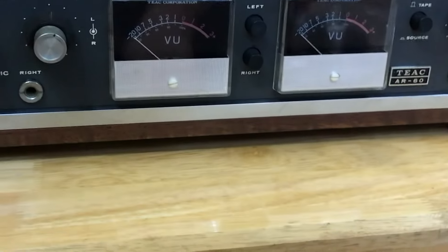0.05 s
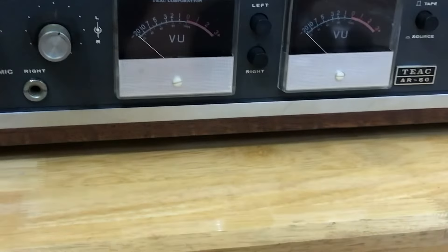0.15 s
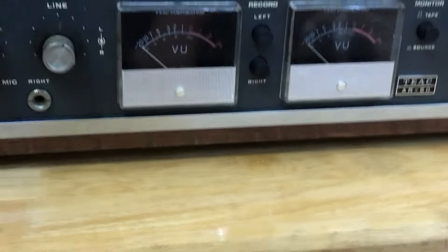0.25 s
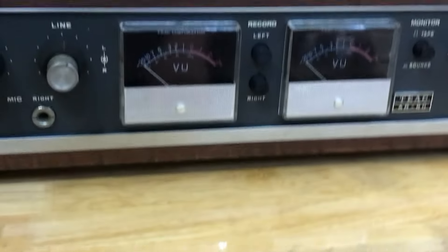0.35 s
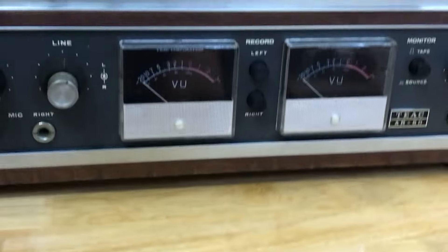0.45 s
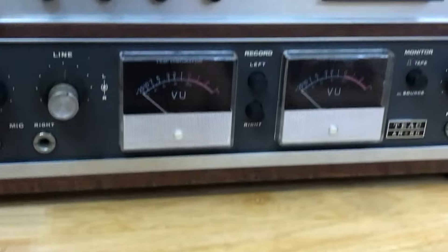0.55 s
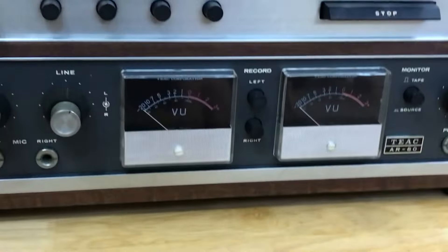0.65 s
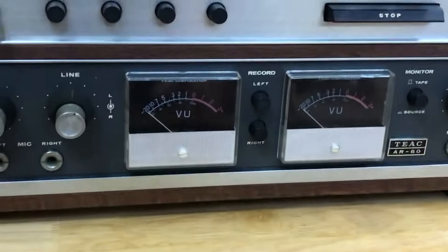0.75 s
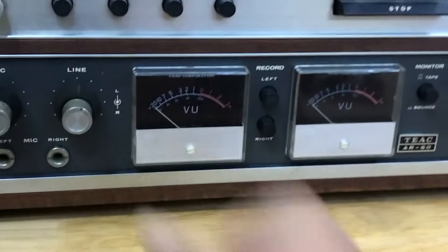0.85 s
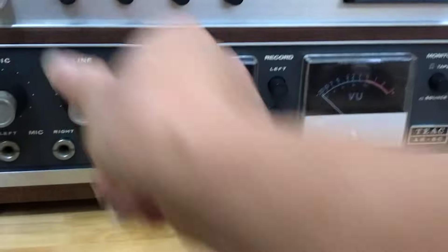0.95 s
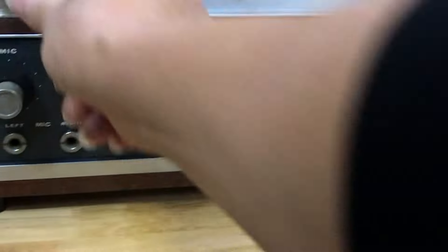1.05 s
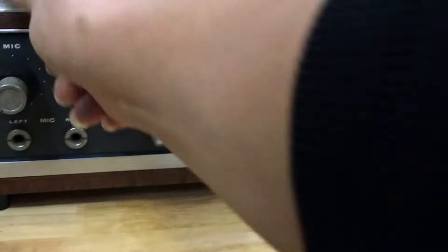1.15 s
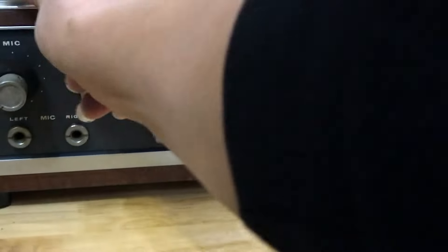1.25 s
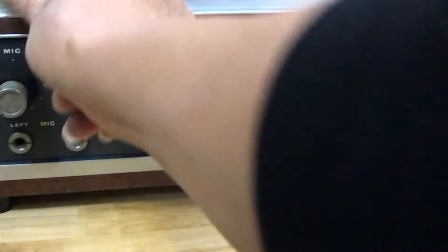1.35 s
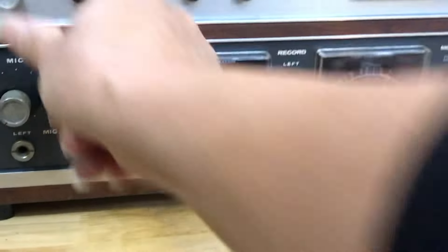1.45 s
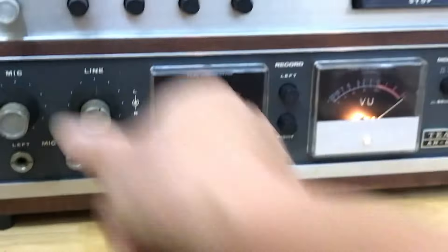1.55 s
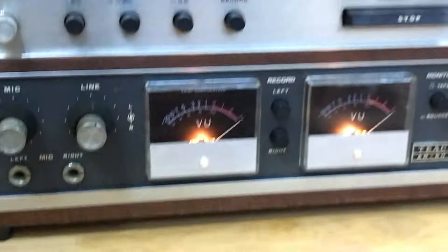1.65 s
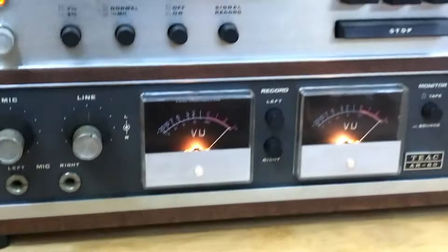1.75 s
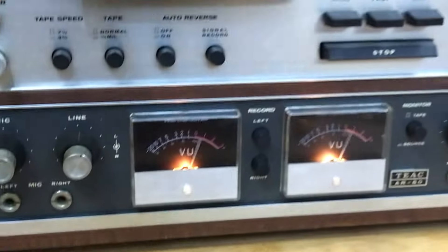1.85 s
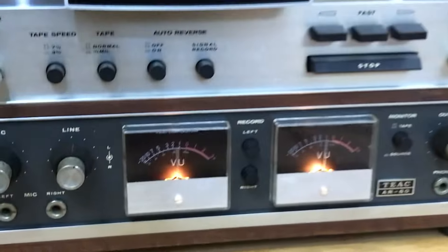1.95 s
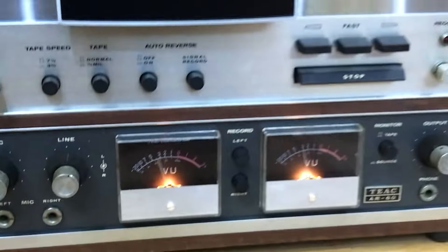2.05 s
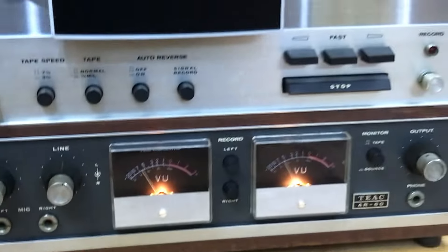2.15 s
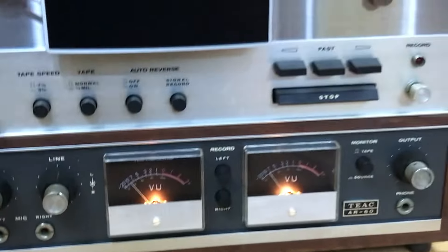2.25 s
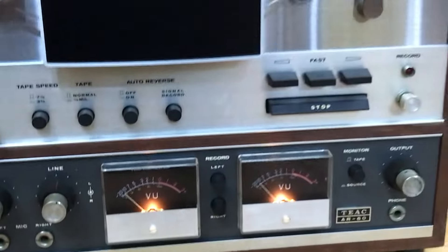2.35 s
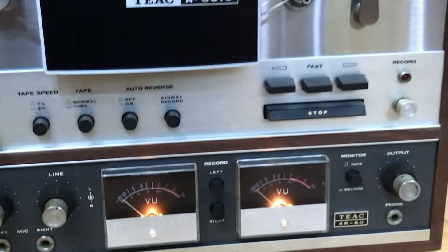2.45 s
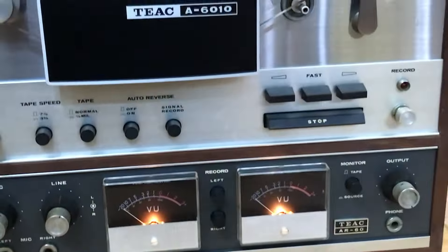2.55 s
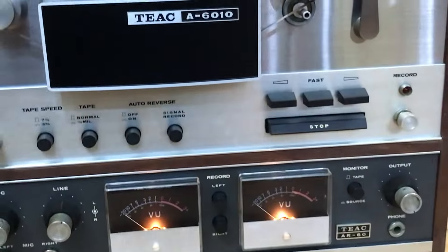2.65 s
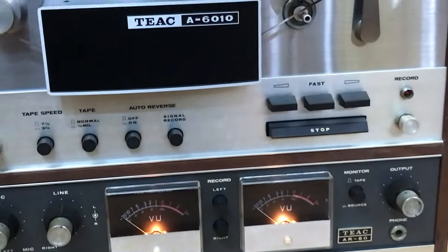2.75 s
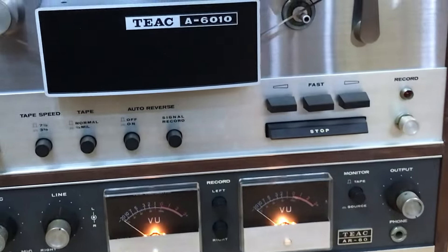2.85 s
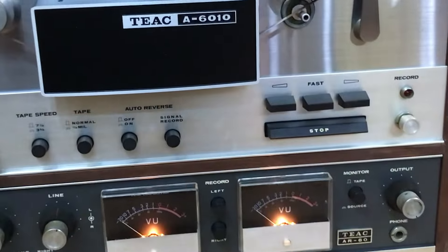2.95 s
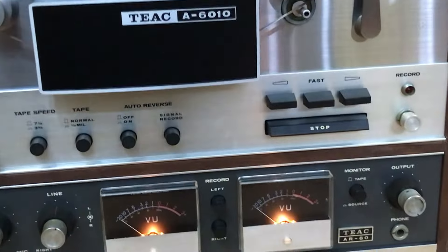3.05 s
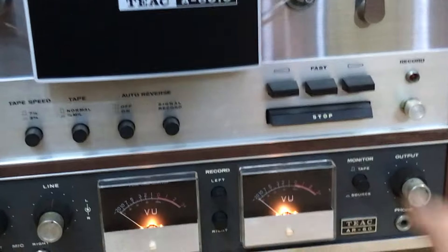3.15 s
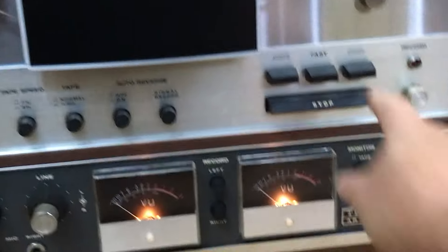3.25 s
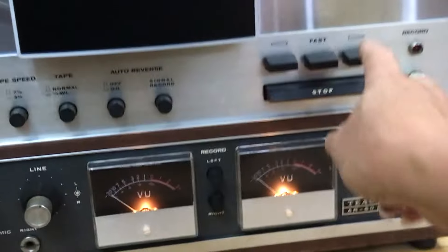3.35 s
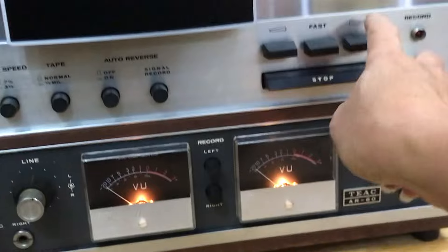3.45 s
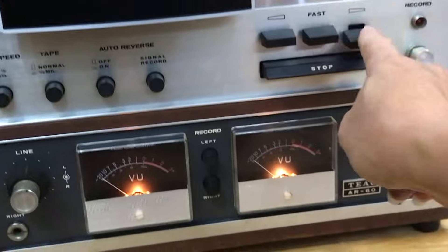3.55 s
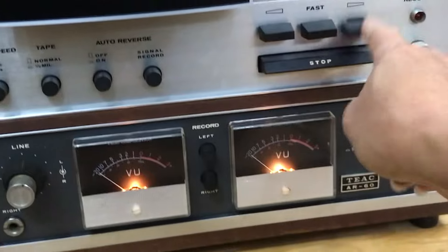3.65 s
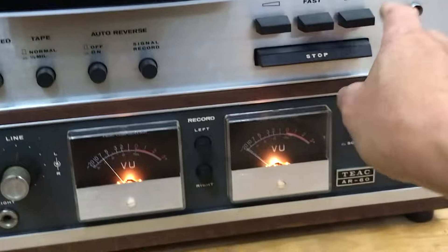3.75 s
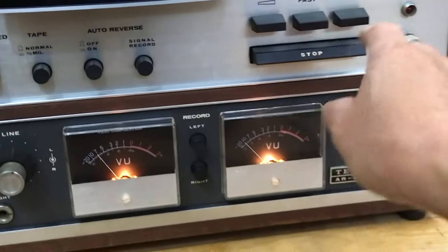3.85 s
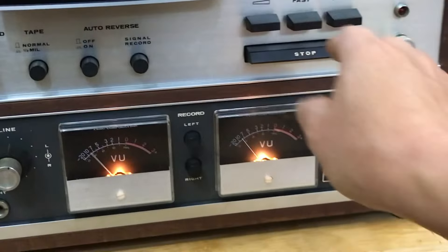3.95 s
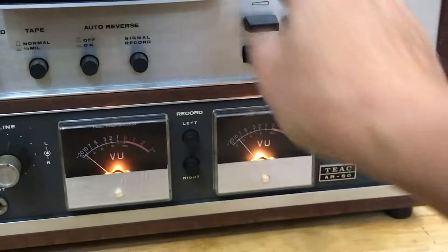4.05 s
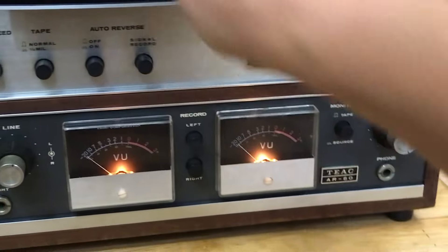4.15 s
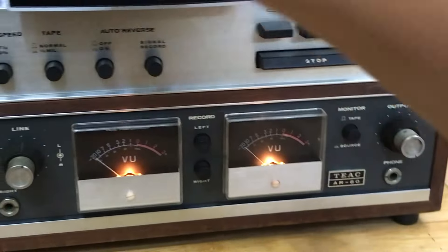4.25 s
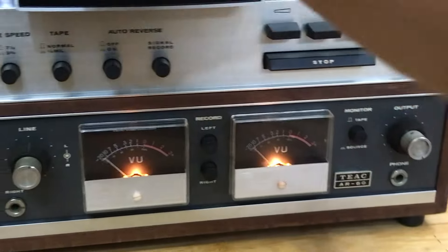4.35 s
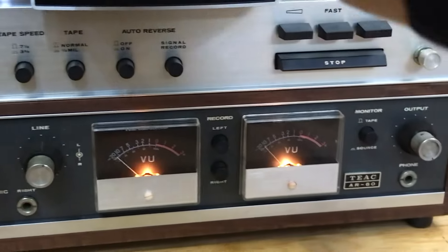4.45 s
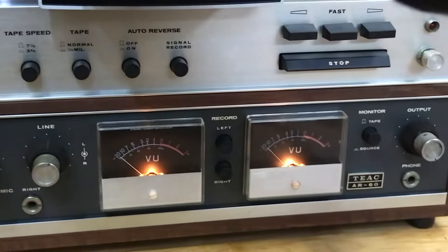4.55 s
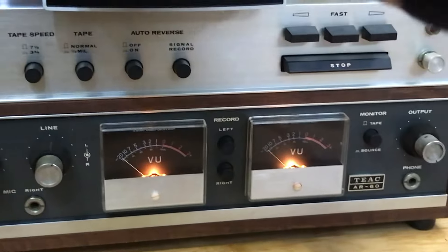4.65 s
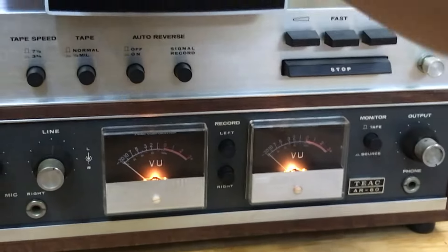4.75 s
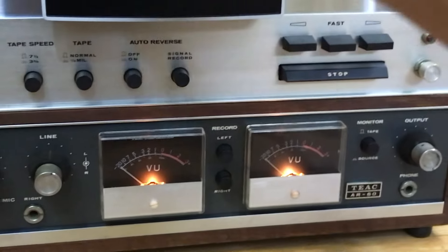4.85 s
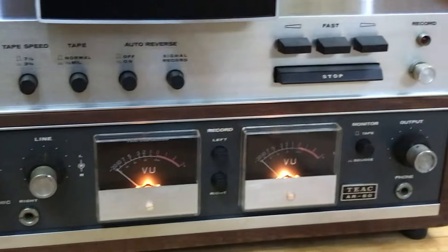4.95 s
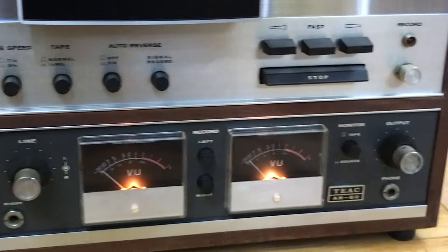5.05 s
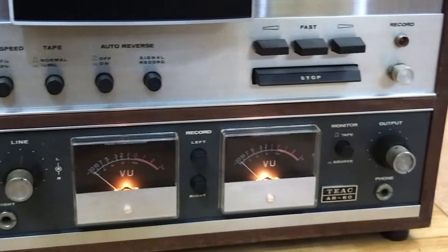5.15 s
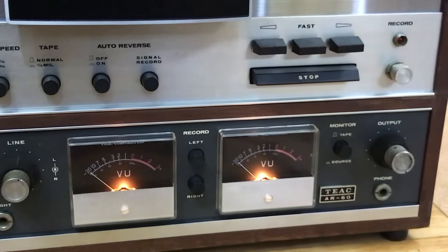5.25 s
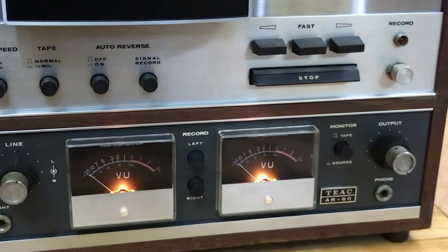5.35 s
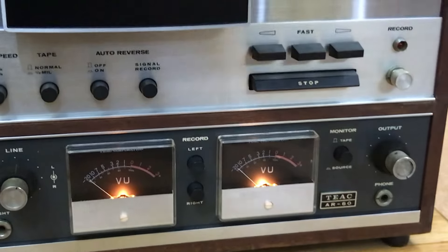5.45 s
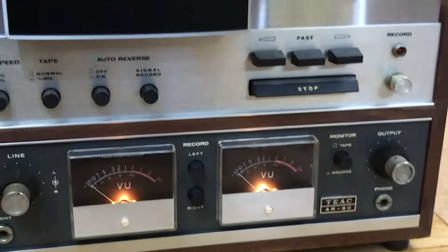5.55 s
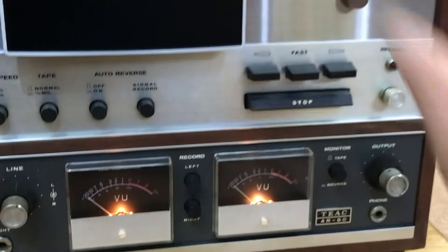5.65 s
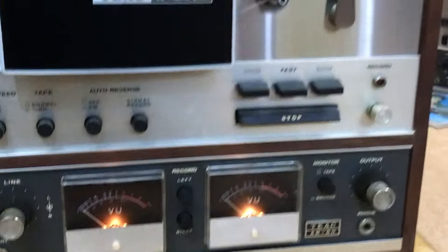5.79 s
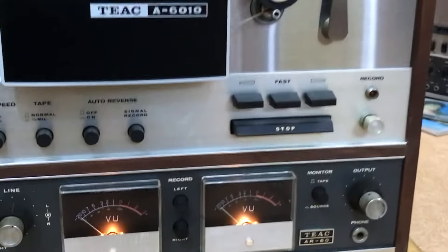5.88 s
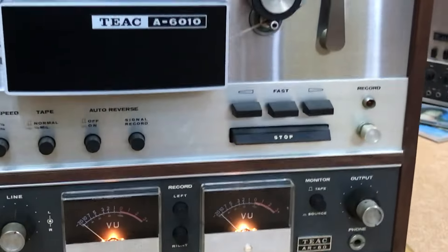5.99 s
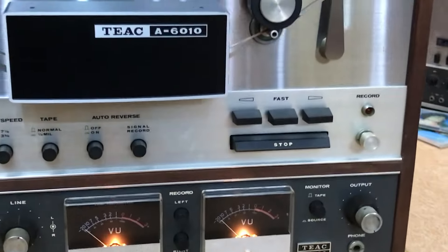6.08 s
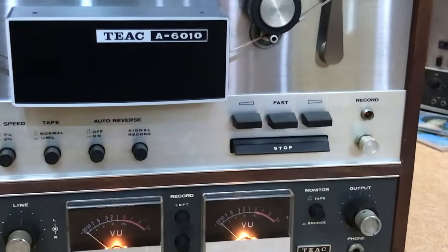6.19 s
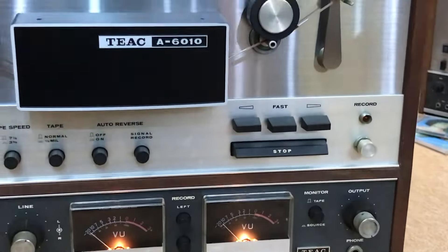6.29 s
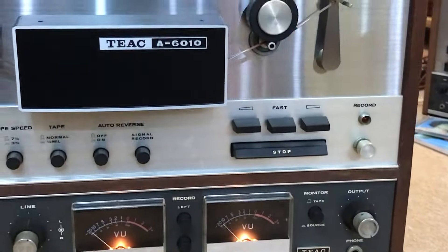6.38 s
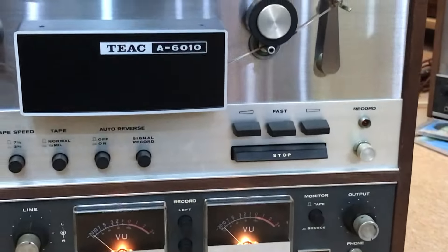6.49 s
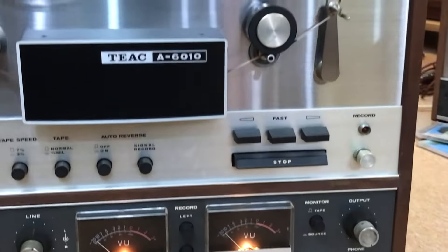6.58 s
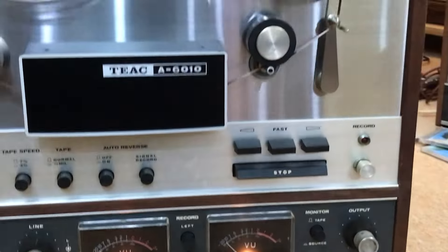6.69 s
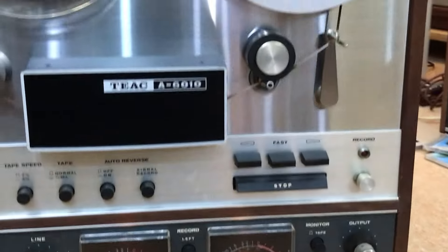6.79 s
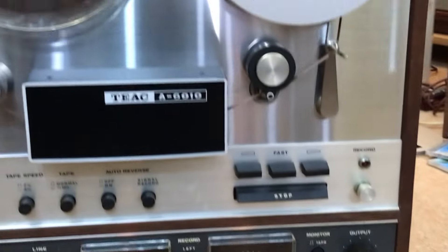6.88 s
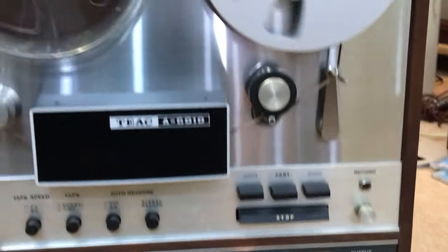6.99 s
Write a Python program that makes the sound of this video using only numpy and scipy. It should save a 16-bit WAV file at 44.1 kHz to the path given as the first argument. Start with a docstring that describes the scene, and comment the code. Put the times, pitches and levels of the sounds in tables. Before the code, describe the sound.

Close to a reel-to-reel tape deck in a small room, a power switch snaps on with a quick double click, and a motor starts humming and swishing faintly. A key then goes down with a louder, ringing metallic clunk, and the tape runs with soft hiss, a few ticks and a dull knock. Two vehicles pass quietly beyond the wall, and the hand-held microphone picks up soft bumps.

```python
"""A small room, a hand-held microphone close to a reel-to-reel tape deck on a wooden table.
The power switch snaps on; later a transport key goes down and its solenoid slams in. Each blow cracks,
rings the metal and fades in the room. A wheel in the deck swishes about eight times a second, and the
running tape hisses, ticks and knocks. Two vehicles pass beyond the wall, over far traffic, and now
and then the hand bumps the microphone."""
import sys
import numpy as np
from scipy import signal
from scipy.fft import rfft, irfft, next_fast_len
from scipy.io import wavfile
from scipy.ndimage import uniform_filter1d

SR = 44100
rng = np.random.default_rng(int(sys.argv[2]) if len(sys.argv) > 2 else 0)


def digitize_waveform(pressure):
    """Quantize a signal to 16-bit integers and store it at the path in sys.argv[1].

    Rows of a 2-D input are taken as channels; values are limited to [-1, 1].
    """
    field = np.atleast_2d(pressure).T
    bounded = np.clip(field, -1, 1)
    quanta = np.round(bounded * 32767).astype(np.int16)
    wavfile.write(sys.argv[1], SR, quanta)


N = 309650
T = np.arange(N) / SR
AGE = T[:SR // 2]  # seconds since a blow

# Blows of key, relay and solenoid, then of the power switch. Each row: start in seconds, level in dB,
# rattle decay in seconds, treble tilt in dB per octave, ring offset in dB.
TRANSPORT_BLOWS = [(3.5182, -32, 0.0033, 3, 0), (3.5287, -25.5, 0.00067, 6, -6.5),
                   (3.534, -27, 0.0079, -1, -1.5), (3.5405, -15, 0.0082, 0, -10),
                   (3.5553, -32, 0.0055, 8, 3), (3.5615, -25, 0.0074, -2.5, 3), (3.5763, -10, 0.0046, 1, 0),
                   (3.5808, -14.5, 0.0051, 2.5, 11.5), (3.6042, -4.5, 0.003, -1, -2),
                   (3.6095, -17, 0.012, 2, -13)]
SWITCH_BLOWS = [(1.1997, -26.5, 0.00055, 24, -35), (1.2058, -23, 0.0052, -7, 1),
                (1.2441, -11.5, 0.0025, 16, -16), (1.2455, -16.5, 0.0029, 1, 7),
                (1.3476, -20.5, 0.0017, -1, -8)]
# Knocks in the tape path. Each row: start in seconds, level in dB, treble tilt in dB per octave.
TAPE_KNOCKS = [(4.569, -20.5, 0), (5.3112, -33, -9)]
# Ticks of the running tape. Each row: start in seconds, level in dB, decay in seconds.
TAPE_TICKS = [(4.354, -52, .004), (4.545, -48, 0.007), (4.905, -51.5, 0.0042), (5.187, -51, 0.0043),
              (5.303, -43.5, 0.021), (6.852, -54.5, 0.0045), (6.942, -55, .004)]
# The hand on the microphone. Each row: start in seconds, level in dB.
HAND_BUMPS = [(1.704, -30), (1.915, -42), (2.045, -33.5), (2.43, -30.5), (6.769, -33.5), (6.813, -41),
              (6.879, -33), (6.947, -34)]
# The colour of each kind of blow. Each row: frequency in Hz, relative level in dB.
TRANSPORT_CRACK = [(200, -19), (400, -5.5), (520, -13), (780, -4), (1050, -6.5), (1350, -1.5), (1600, 1),
                   (2200, -3), (2850, 1.5), (3900, -9), (5600, -4), (7700, -13.5), (8900, -5.5),
                   (10500, -16), (11700, -6.5), (13500, -14), (16000, -10.5)]
SWITCH_CRACK = [(150, -10), (450, -16), (620, -6.5), (850, -14), (1020, -4), (1300, -3.5), (1750, 5),
                (2400, -4.5), (4300, 6.5), (5000, 0.5), (5800, 3.5), (8200, -2.5), (9800, 0), (16000, -13)]
KNOCK_COLOUR = [(80, -20), (230, 16), (420, 1.5), (600, 1.5), (1000, 11.5), (1650, 11), (2000, 0),
                (2500, -14.5), (6000, -35), (15000, -55)]
TICK_COLOUR = [(500, -19), (2500, 9.5), (4000, -2), (5800, 6), (8000, -5), (15000, -3)]
BUMP_COLOUR = [(30, -16), (65, -16.5), (160, 0.5), (280, -20), (600, -39), (3000, -65)]
# Parts of the deck that ring. Each row: frequency in Hz, relative level in dB, seconds to fall 60 dB.
CHASSIS_MODES = [(571, -9.5, 0.75), (687, -11, 0.23), (875, -7, 0.32), (1230, -8, 0.42), (1370, -1.5, 0.23),
                 (1620, -9, 0.17), (2130, -10, 0.38), (2390, -20, 0.35), (2840, -20, .33),
                 (3040, -30.5, .35), (3231, -22, .25), (4080, -30, .4), (5240, -18.5, 0.18),
                 (5700, -21, .25), (6180, -14, .35), (6560, -13, .3), (9350, -18, .2), (8952, -18, .18),
                 (11550, -16, .18)]
CABINET_MODES = [(149.6, -15, 0.41), (233, -2, 0.055), (307.4, 4.5, 0.23), (323, -6, 0.04), (387, -16, .06),
                 (441, -5.5, .08)]
PANEL_MODES = [(583, -4, 0.32), (1028, -1, .13), (1410, -22, .16), (1634, 5, .05), (1860, -12, 0.146),
               (4410, -3, 0.26), (4904, -28, .25), (5780, -6, 0.25), (6940, -11, 0.48), (10030, -7, 0.25),
               (11000, -21.5, 0.22)]
SPRING_MODES = [(1315, -11, 0.12), (1553, 1.5, 0.05), (1935, -4, 0.038)]
TAPE_ARM_MODES = [(168, -5, 0.17), (228, -7, 0.14), (244, 4, 0.18), (598, 6, 0.2), (987, 4, 0.23)]
# The motor's hum. Each row: frequency in Hz, level in dB.
MOTOR_HUM = [(323, -69.5), (376, -76)]
# Noise of the wheel, the tape on the heads, the street's rumble, the tyres and the microphone.
# Each row: frequency in Hz, relative level in dB.
SWISH_COLOUR = [(200, -35.5), (500, -7), (750, 0.5), (980, 2.5), (1200, -5), (1450, -5), (1900, -25),
                (4000, -24.5), (12000, -35)]
TAPE_COLOUR = [(2000, -17), (4500, -8), (6000, 0.5), (7500, -9), (11000, -6), (16000, -10)]
RUMBLE_COLOUR = [(20, -36.5), (35, -13.5), (50, -0.5), (80, -3.5), (150, 1), (210, -9.5), (320, -10),
                 (450, -18.5), (800, -31.5), (3000, -73.5)]
TYRE_COLOUR = [(150, -7.5), (400, 2.5), (750, -4.5), (1300, -1.5), (2200, -10), (4000, -17.5), (6000, -25),
               (10000, -32.5), (16000, -42)]
MIC_HISS_COLOUR = [(1180, -35.5), (2000, -10), (2380, -3), (2640, -12), (3940, 1.5), (4770, -6.5),
                   (5300, -4.5), (5990, -0.5), (7310, -10), (8850, -3), (10500, -9), (12200, -3.5),
                   (15100, -2), (16000, -10.5)]
# Vehicles beyond the wall. Each row: nearest moment in seconds, seconds to drive its own distance
# from us, engine cycle rate in Hz, Doppler shift as a fraction, rumble in dB, tyre roar in dB.
VEHICLES = [(0.548, 0.76, 25.45, .027, -44, -52.5), (3.5, 0.97, 30.65, .057, -49.5, -57.5)]
# Each engine's main orders. Each row: order, peak in dB, peak delay in seconds, half-length of the
# swell in seconds, dip delay in seconds. Delays count from the nearest moment.
FIRST_MAIN_ORDERS = [(2, -42.5, 0.44, 0.46, 1.26), (4, -41, -0.12, 0.48, 0.48), (5, -41.5, .05, 0.35, .58),
                     (6, -48, 0.28, 0.86, -0.11)]
SECOND_MAIN_ORDERS = [(2, -41.5, -0.065, 0.45, 1.2), (4, -43.5, .1, 0.67, .32), (5, -47, 0.42, 1.2, 0.36),
                      (10, -50, -0.041, 0.54, -0.47)]
# Each engine's weak orders. Each row: order, level in dB against the mean of the main ones.
FIRST_WEAK_ORDERS = [(7, -8), (9, -10.5), (11, -21), (12, -16), (13, -13.5), (15, -15)]
SECOND_WEAK_ORDERS = [(3, -8.5), (7, -20.5), (9, -18.5), (11, -10.5), (13, -16)]

MOTOR_ON_S, SOLENOID_S = 1.25, 3.6075


def transport():
    """Close by, the key goes down, the relay pulls in and the solenoid's plunger booms the cabinet."""
    out = blows(TRANSPORT_BLOWS, TRANSPORT_CRACK, CHASSIS_MODES, ring_db=-18, snap=0.34, build=0.32,
                flutter_s=0.014, flutter_db=-14.5, flutter_hz=1530)
    boom = ring(CABINET_MODES, split=0.015) * (1 - np.exp(-AGE / .004))
    add(out, SOLENOID_S, strength(boom, db=-11))
    return out


def switch(flip_s=1.2448):
    """The power switch touches, snaps over with a twang of its spring and clicks as the finger lets go."""
    out = blows(SWITCH_BLOWS, SWITCH_CRACK, PANEL_MODES, ring_db=-14.5, snap=0.93, build=0.032,
                flutter_s=0.019, flutter_db=-2.5, flutter_hz=1210)
    add(out, flip_s, strength(ring(SPRING_MODES, split=0.016), db=-12.5))
    return out


def blows(table, crack_colour, modes, ring_db, snap, build, flutter_s, flutter_db, flutter_hz):
    """A first contact, a rattle of tiny ones, a slower flutter of the panel and the ring of the metal."""
    out = np.zeros(N)
    lowpass = signal.butter(2, flutter_hz, fs=SR, output="sos")
    for start_s, db, decay_s, tilt_db, ring_offset_db in table:
        rattle, flutter = rng.standard_normal((2, len(AGE)))
        rattle = rattle * np.exp(-AGE / decay_s) * (1 - np.exp(-AGE / (build * decay_s)))
        rattle[0] += snap  # the first contact
        flutter = signal.sosfilt(lowpass, flutter) * np.exp(-AGE / flutter_s)
        force = strength(rattle, 0) + strength(flutter, flutter_db)
        crack = strength(colour(force, crack_colour, tilt_db), db)
        metal = strength(ring(modes, split=0.024), db + ring_db + ring_offset_db)
        add(out, start_s, crack + metal)
    return out


def ring(modes, split):
    """Modes die away in close, beating pairs; each blow lands on a new spot and shares them out anew."""
    out = 0
    for (hz, db, t60), (side, share_db, gap) in zip(modes, rng.standard_normal((len(modes), 3))):
        pair = np.sin(2 * np.pi * hz * AGE) + .5 * np.sin(2 * np.pi * hz * (1 + split * gap) * AGE)
        out = out + np.sign(side) * undb(db + share_db - 60 * AGE / t60) * pair
    return out


def knocks(ring_db=-8, shudder_db=-11, shudder_s=0.0054):
    """Padded contacts in the tape path, each with a slight shudder and a dull ring of the tape arm."""
    out = np.zeros(N)
    for start_s, db, tilt_db in TAPE_KNOCKS:
        shudder = strength(burst(shudder_s), shudder_db)
        force = strength(signal.unit_impulse(len(AGE)), 0) + shudder
        knock = strength(colour(force, KNOCK_COLOUR, tilt_db), db)
        arm = strength(ring(TAPE_ARM_MODES, split=0.061), db + ring_db)
        add(out, start_s, knock + arm)
    return out


def ticks():
    """Small dry ticks of the tape on its reels."""
    out = np.zeros(N)
    for start_s, db, decay_s in TAPE_TICKS:
        add(out, start_s, strength(colour(burst(decay_s), TICK_COLOUR), db))
    return out


def motor(turn_hz=7.955, rub_db=-58, light_rub_db=-7, width_turns=0.18, fade_in_s=0.7):
    """The motor hums; a wheel on it rubs once a turn, and more lightly half a turn later."""
    turns = T * turn_hz
    heavy, light = (np.exp(-(((turns + shift) % 1 - .5) / width_turns) ** 2) for shift in (.5, 0))
    rub = noise(SWISH_COLOUR) * (heavy + undb(light_rub_db) * light) * undb(rub_db + 0.51 * wander(28))
    hum = sum(np.sqrt(2) * undb(db + 1.5 * wander(1.5)) * np.sin(2 * np.pi * hz * T)
              for hz, db in MOTOR_HUM)
    return (rub + hum) * np.clip((T - MOTOR_ON_S) / fade_in_s, 0, 1)


def tape(db=-73.5, fade_in_s=.3):
    """Once the solenoid is in, the moving tape hisses softly over the heads and guides."""
    return noise(TAPE_COLOUR) * undb(db) * np.clip((T - SOLENOID_S) / fade_in_s, 0, 1)


def room(x, wet_db, build_s=0.0028):
    """The direct sound and the small room's diffuse echo behind it; the treble dies first."""
    tail = 0
    for band_hz, t60, db in (((150, 1500), 0.59, 0), ((1500, 6500), 0.62, -.5), ((6500, 16000), 0.45, -2)):
        bandpass = signal.butter(2, band_hz, "band", fs=SR, output="sos")
        tail = tail + signal.sosfilt(bandpass, rng.standard_normal(len(AGE))) * undb(db - 60 * AGE / t60)
    tail *= 1 - np.exp(-(AGE / build_s) ** 2)
    return x + undb(wet_db) * signal.fftconvolve(x, tail / np.sqrt(np.sum(tail ** 2)))[:N]


def street(far_rumble_db=-55.5, far_roar_db=-63.5, wake_s=0.11, wake_stretch=1.004):
    """Beyond the wall, two vehicles swell and sink in pitch as they pass, over steady far traffic."""
    engines, rumble_power, roar_power = 0, undb(far_rumble_db) ** 2, undb(far_roar_db) ** 2
    orders = (FIRST_MAIN_ORDERS, FIRST_WEAK_ORDERS), (SECOND_MAIN_ORDERS, SECOND_WEAK_ORDERS)
    for (nearest_s, half_s, cycle_hz, doppler, rumble_db, roar_db), (main, weak) in zip(VEHICLES, orders):
        receding = (T - nearest_s) / np.hypot(T - nearest_s, half_s)
        engines = engines + engine(nearest_s, cycle_hz * (1 - doppler * receding), main, weak)
        wake = swell(nearest_s + wake_s, half_s * wake_stretch)  # road noise peaks just after the pass
        rumble_power = rumble_power + (wake * undb(rumble_db)) ** 2
        roar_power = roar_power + (wake * undb(roar_db)) ** 2
    rumble = noise(RUMBLE_COLOUR) * np.sqrt(rumble_power) * undb(wander(7.2))
    roar = noise(TYRE_COLOUR) * np.sqrt(roar_power) * undb(0.64 * wander(11))
    return rumble + roar + engines


def engine(nearest_s, cycle_hz, main, weak, waver=0.0022, fading_db=0.7, dip_db=-9.5, dip_half_s=0.11):
    """Each main engine order swells in its own time and dips where a house front's echo cancels it."""
    cycles = np.cumsum(cycle_hz * (1 + waver * wander(12))) / SR
    partials, swells = [], []
    for order, db, peak_delay_s, half_s, dip_delay_s in main:
        swells.append(undb(db) * swell(nearest_s + peak_delay_s, half_s))
        dip = undb(dip_db * np.exp(-((T - nearest_s - dip_delay_s) / dip_half_s) ** 2))
        partials.append((order, swells[-1] * dip))
    mean_swell = np.exp(np.mean(np.log(swells), axis=0))
    partials += [(order, mean_swell * undb(db)) for order, db in weak]
    out = 0
    for order, gain in partials:
        fading = undb(fading_db * wander(6))
        out = out + gain * fading * np.sin(2 * np.pi * (order * cycles + rng.random()))
    return np.sqrt(2) * out


def swell(nearest_s, half_s, loss_db=28.5):
    """Gain of a source passing on a straight line: it loses loss_db for each tenfold distance."""
    distance = np.hypot(1, (T - nearest_s) / half_s)
    return undb(-loss_db * np.log10(distance))


def bumps():
    """Soft thuds of the hand that reach the microphone through its case."""
    out = np.zeros(N)
    for start_s, db in HAND_BUMPS:
        add(out, start_s, strength(colour(burst(decay_s=0.0049), BUMP_COLOUR), db))
    return out


def mic_hiss(db=-72.5):
    """The microphone's own steady hiss."""
    return noise(MIC_HISS_COLOUR) * undb(db)


def undb(db):
    """Decibels to gain."""
    return 10 ** (np.asarray(db) / 20)


def unit(x):
    """Scale to an rms of one."""
    return x / np.sqrt(np.mean(x ** 2))


def strength(x, db):
    """Scale a blow to the energy of one millisecond at this level."""
    return x * undb(db) * np.sqrt(SR / 1000 / np.sum(x ** 2))


def add(out, start_s, x):
    """Mix a sound in at its start time."""
    i = int(start_s * SR)
    out[i:i + len(x)] += x[:N - i]


def colour(x, points, tilt_db=0):
    """Causal filter through (Hz, dB) points, tilted by tilt_db per octave about 3 kHz."""
    size = next_fast_len(len(x) + 8192)
    size += size % 2
    octave = np.log2(np.maximum(np.arange(size // 2 + 1) * SR / size, 10))
    hz, db = np.transpose(points)
    gain_db = np.interp(octave, np.log2(hz), db) + tilt_db * np.maximum(octave - np.log2(3000), -2)
    # minimum phase, so nothing sounds ahead of a blow
    cepstrum = irfft(gain_db * np.log(10) / 20)
    cepstrum[1:size // 2] *= 2
    cepstrum[size // 2 + 1:] = 0
    return irfft(rfft(x, size) * np.exp(rfft(cepstrum)))[:len(x)]


def burst(decay_s):
    """White noise that starts at once and dies away."""
    return rng.standard_normal(len(AGE)) * np.exp(-AGE / decay_s)


def noise(points):
    """Steady noise of a given colour."""
    return unit(colour(rng.standard_normal(N), points))


def wander(rate_hz):
    """Smooth random drift with an rms of one."""
    hold = int(SR / rate_hz)
    steps = np.repeat(rng.standard_normal(N // hold + 1), hold)
    return unit(uniform_filter1d(steps, hold)[:N])


def scene():
    """One hand-held microphone: the deck close by in its room, the street beyond the wall."""
    deck = room(switch(), wet_db=-15.5) + room(transport(), wet_db=-14.0)
    deck = deck + room(knocks() + ticks(), wet_db=-22.5) + motor() + tape()
    return (deck + street() + bumps() + mic_hiss())[None]


def record(dry):
    """The recorder rounds the highest peaks and cuts the top."""
    ceiling, top_hz = .75, 16000
    lowpass = signal.ellip(10, .2, 80, top_hz, fs=SR, output="sos")
    return signal.sosfilt(lowpass, ceiling * np.tanh(dry / ceiling))


dry = scene()
out = record(dry)
digitize_waveform(out)
```